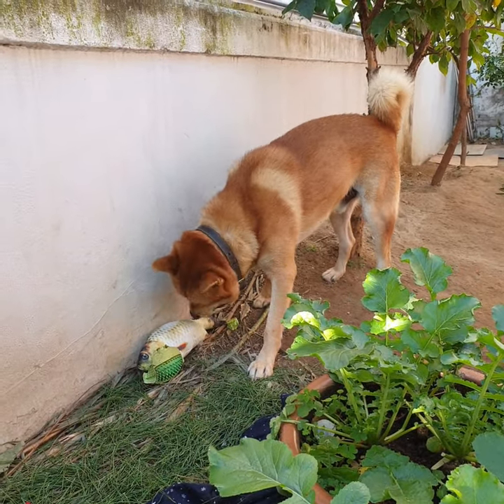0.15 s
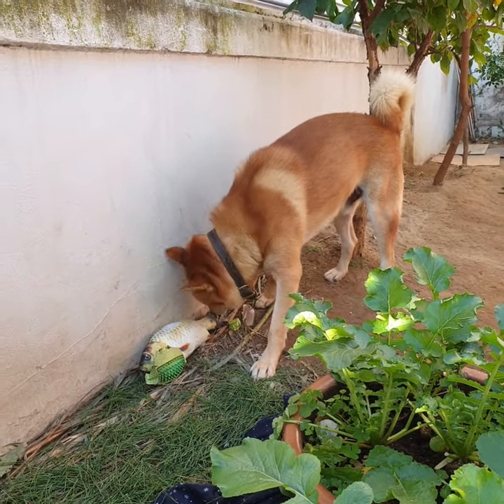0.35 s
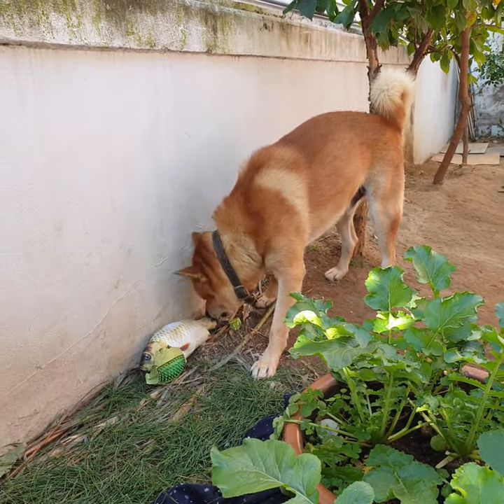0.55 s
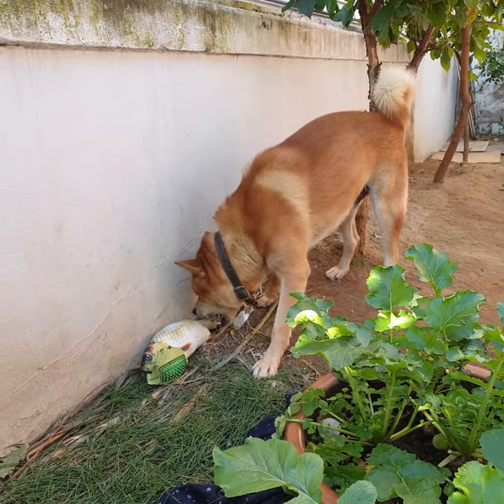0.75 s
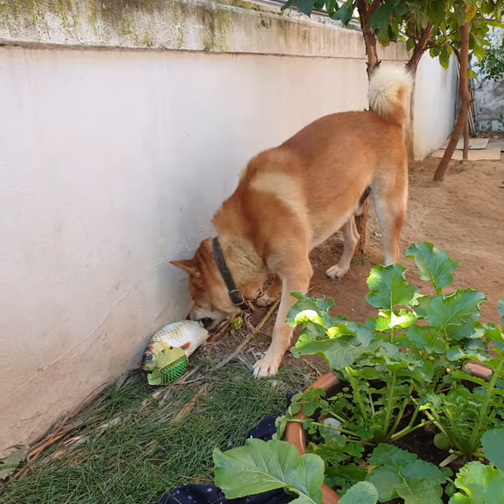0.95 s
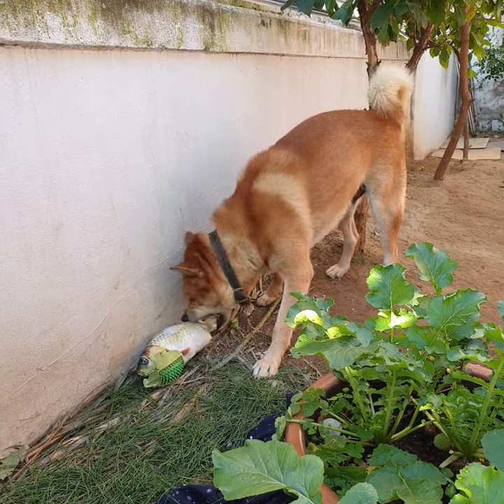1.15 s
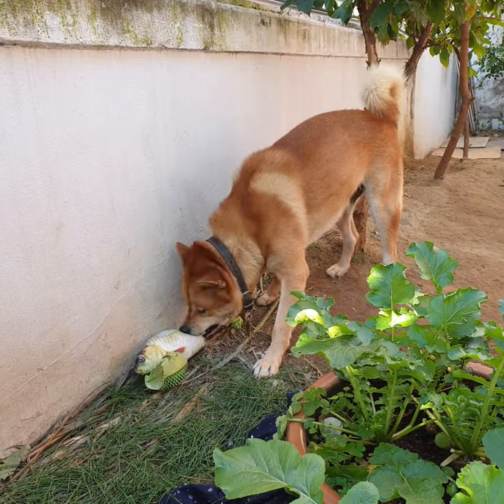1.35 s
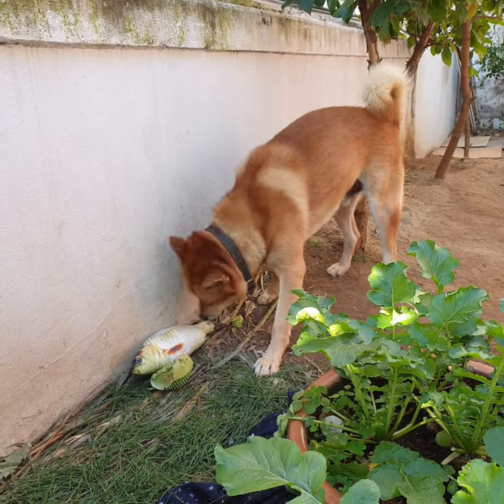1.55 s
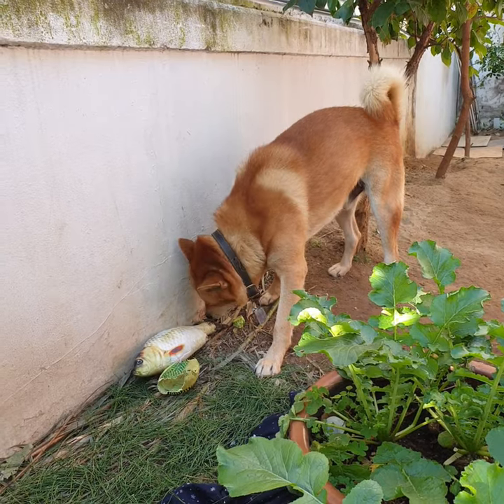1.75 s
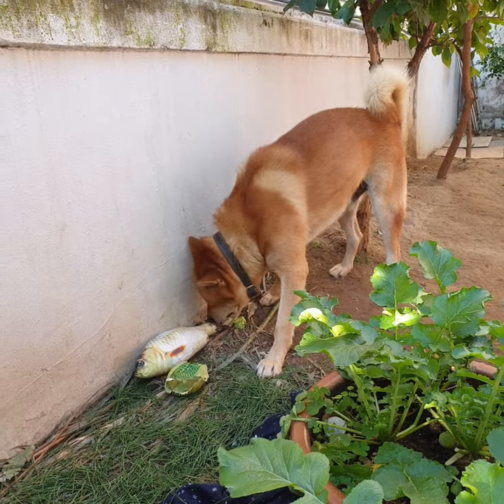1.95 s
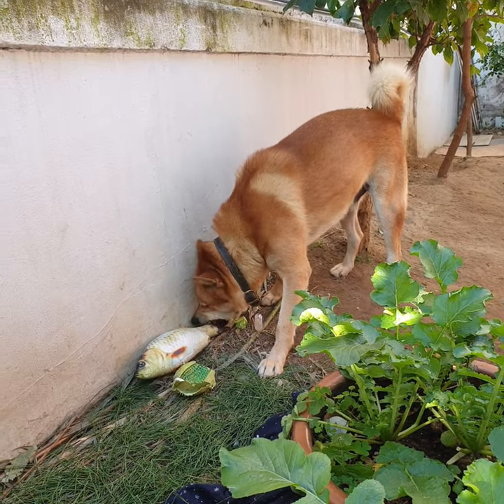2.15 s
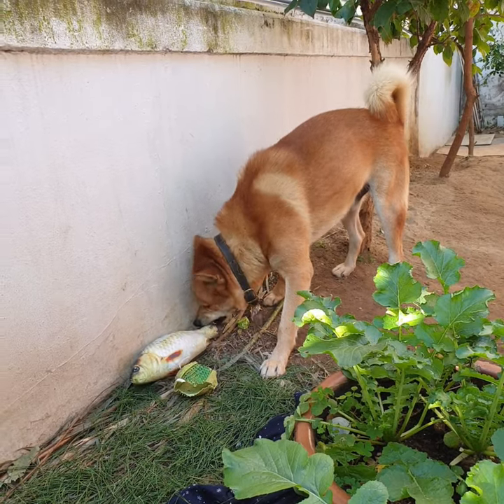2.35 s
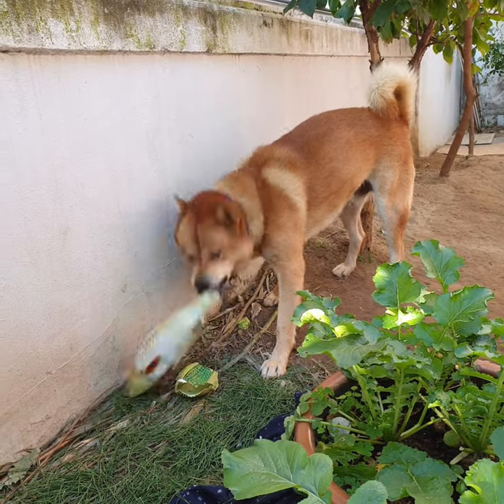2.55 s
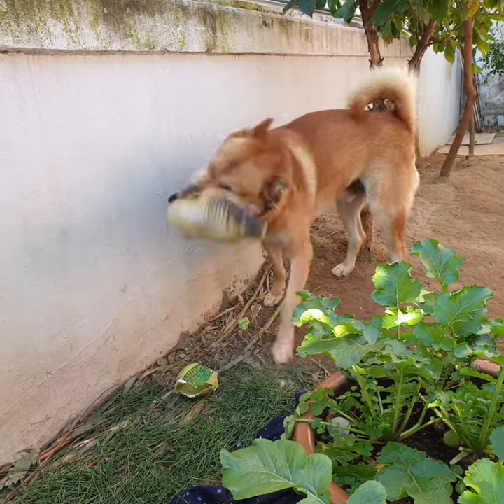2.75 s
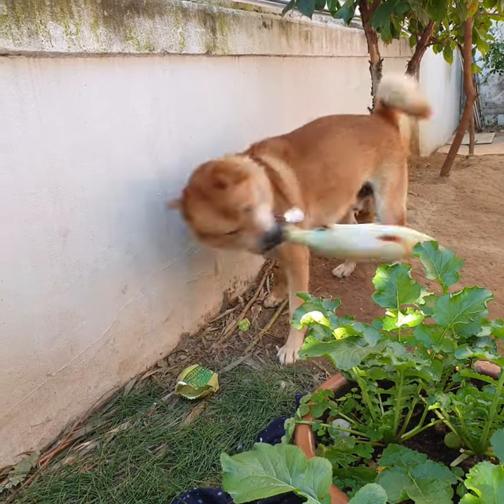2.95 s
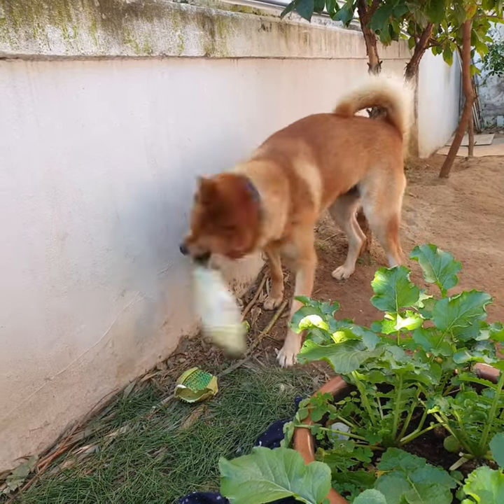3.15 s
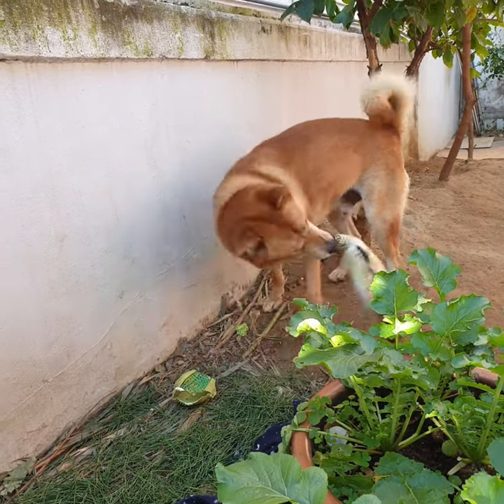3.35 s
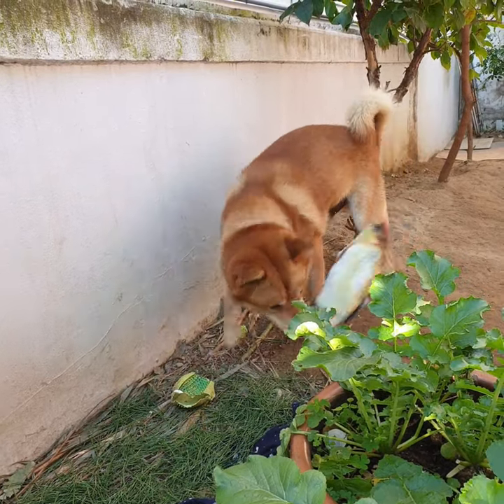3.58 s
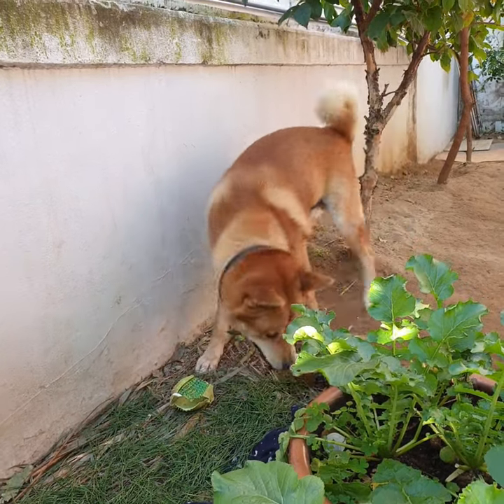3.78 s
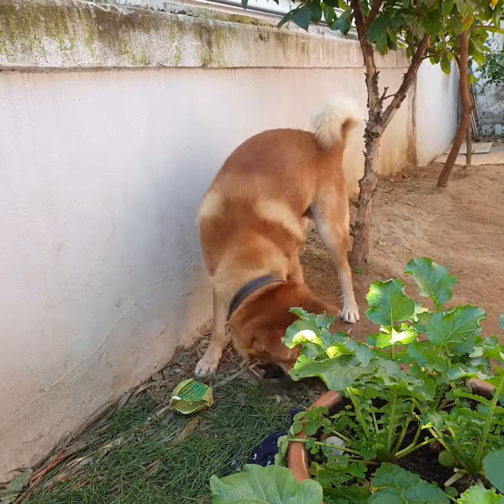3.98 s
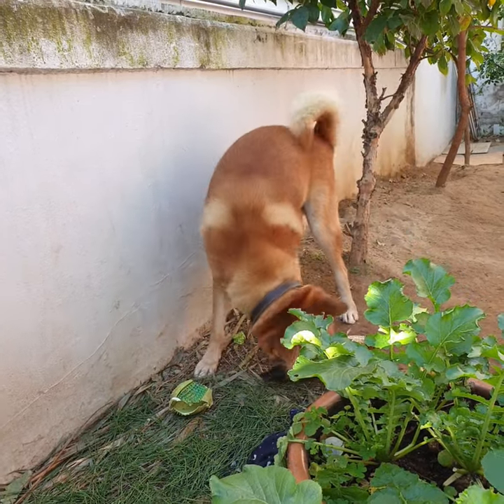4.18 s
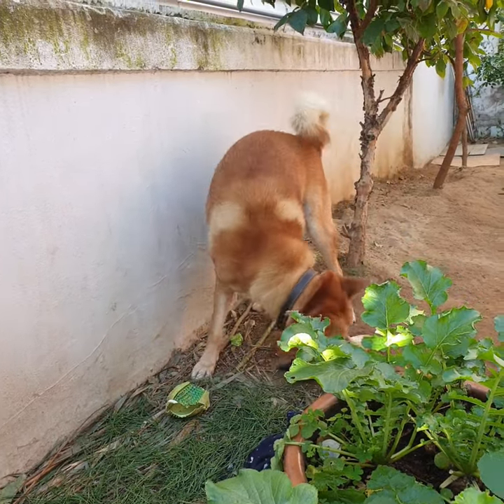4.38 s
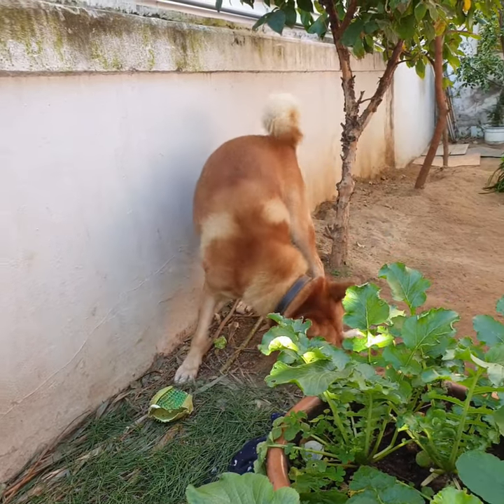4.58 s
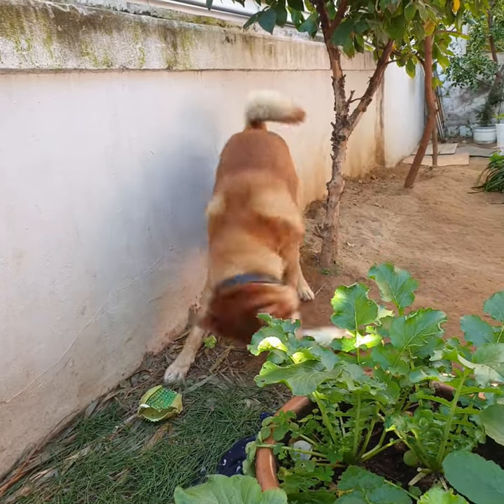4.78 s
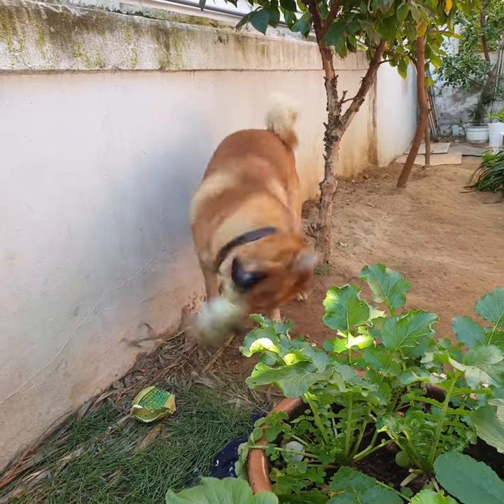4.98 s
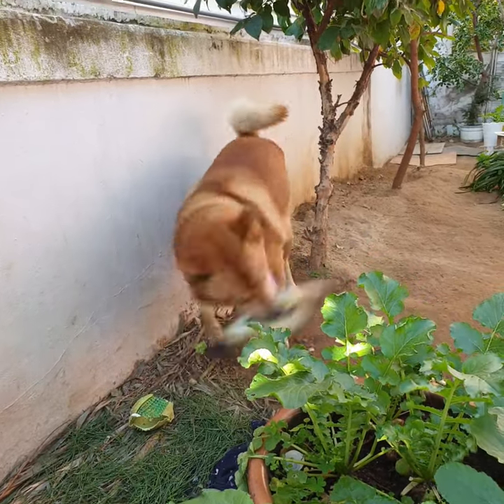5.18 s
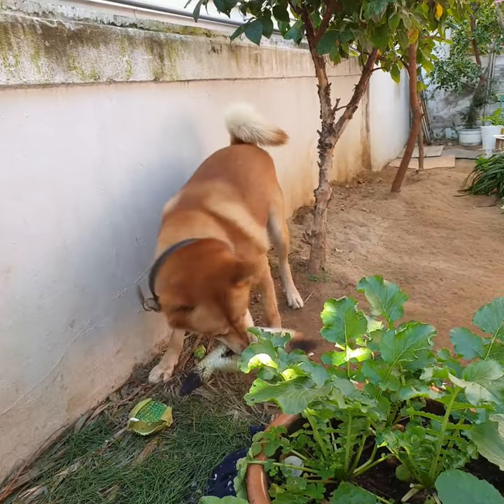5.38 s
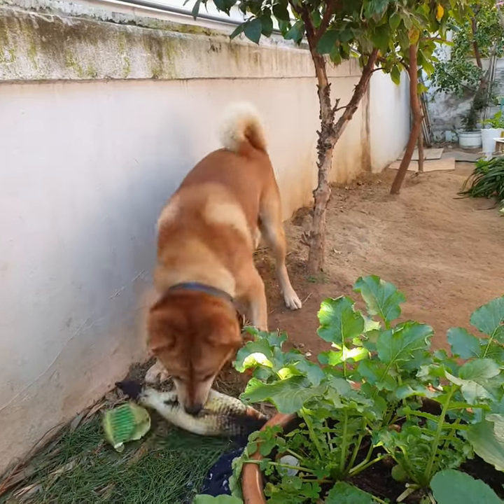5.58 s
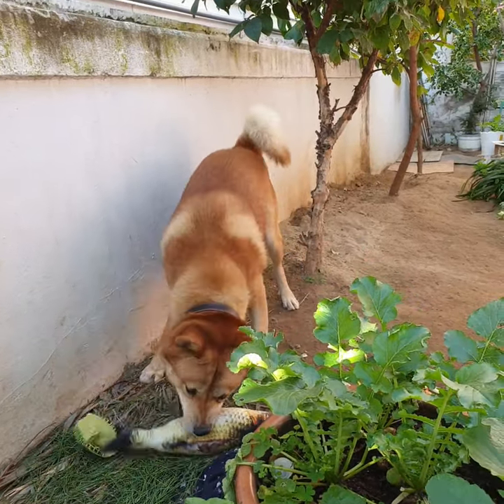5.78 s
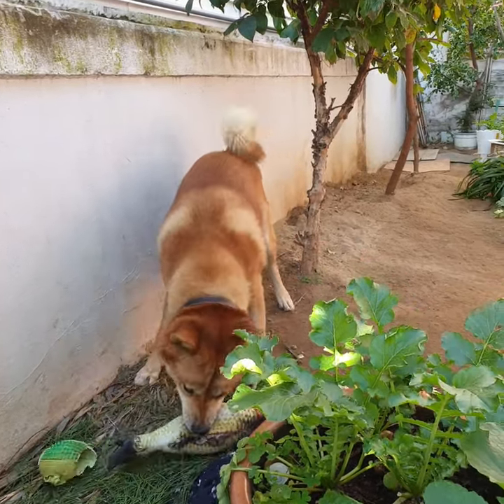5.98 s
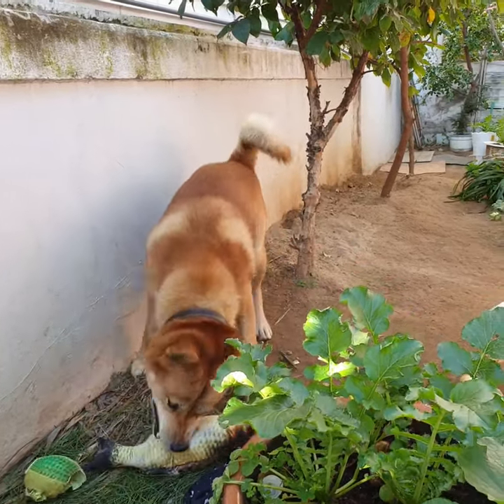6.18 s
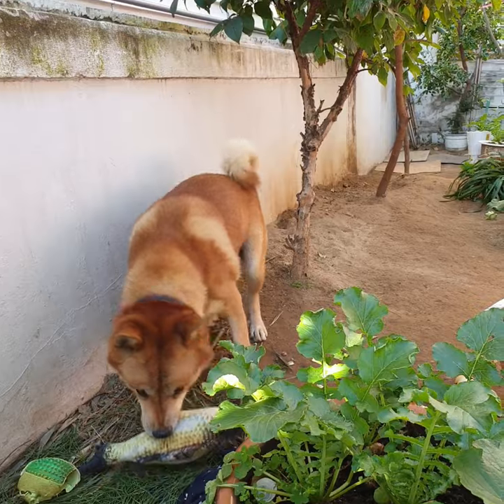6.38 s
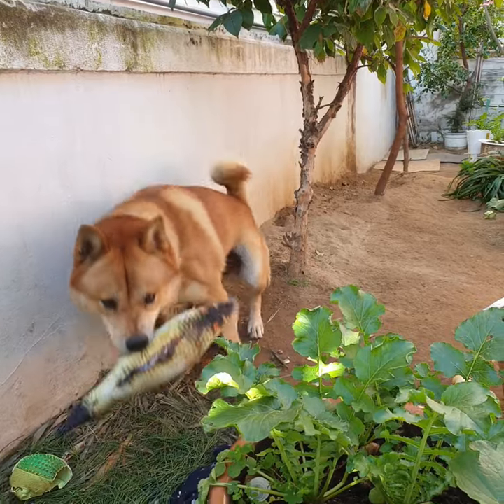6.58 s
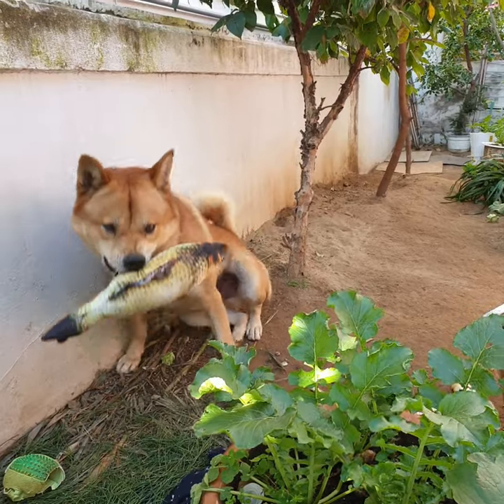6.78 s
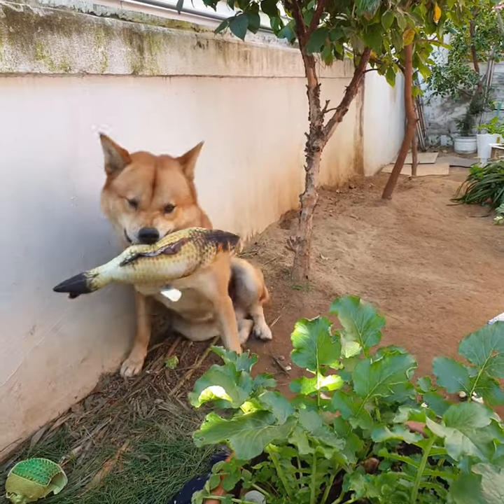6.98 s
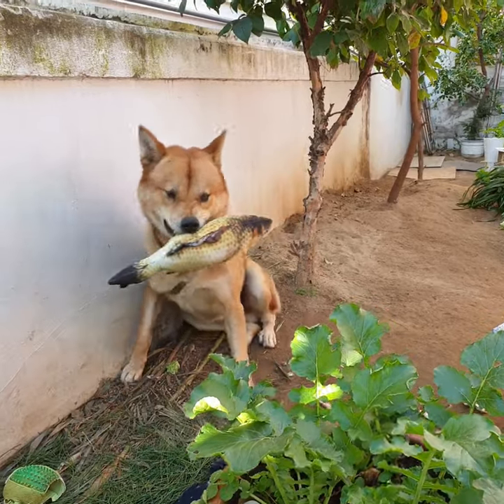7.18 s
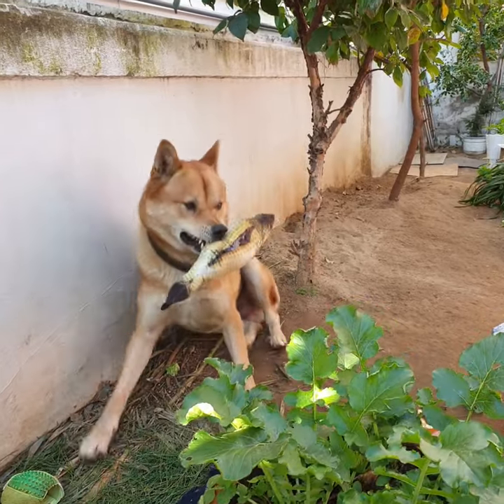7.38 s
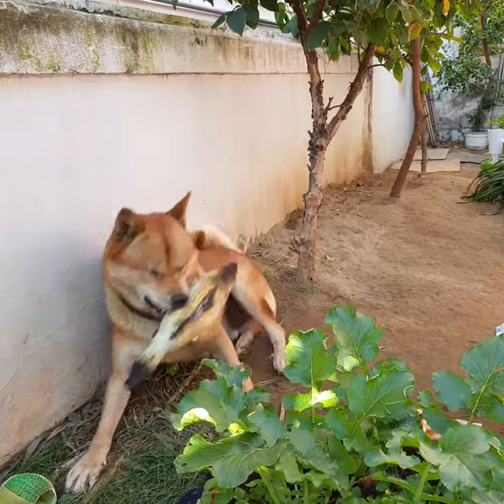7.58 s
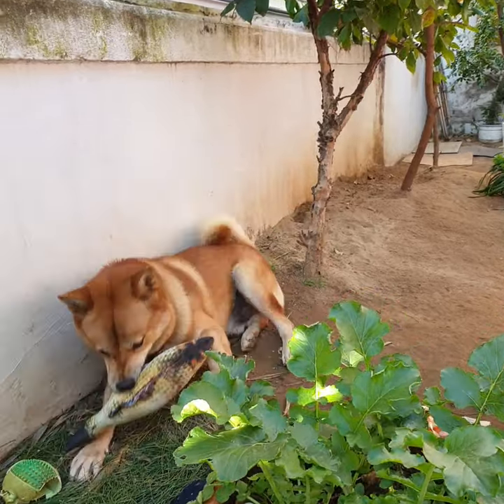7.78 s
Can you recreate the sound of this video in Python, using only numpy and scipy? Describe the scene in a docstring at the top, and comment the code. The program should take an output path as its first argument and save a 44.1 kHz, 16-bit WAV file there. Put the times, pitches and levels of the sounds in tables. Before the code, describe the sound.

In a quiet garden with a low rumble of far traffic, cloth and dry grass rustle softly as a dog mouths a stuffed toy near the microphone. Its metal collar tags break into two bouts of bright jingling, the first with a dull knock of the toy and a twig crack. Lighter clinks and scuffs follow, then one sharp snap, with very short echoes off a wall.

```python
"""Far traffic rumbles under a faint hiss, and two faint high chirps sound. Beside a garden wall a dog
shakes and mouths a soft toy. Grass and cloth rustle as crowds of tiny noise pulses; twigs snap and tick
in short bursts. The metal collar tags collide and jingle in their free modes of vibration; the stuffed
toy thumps in low, heavily damped ones. Wall and ground return short echoes of the tags and bursts."""
import sys
import numpy as np
from scipy import signal
from scipy.fft import rfft, irfft, next_fast_len
from scipy.io import wavfile

SR = 44100
rng = np.random.default_rng(int(sys.argv[2]) if len(sys.argv) > 2 else 0)


def inscribe(sig):
    """Save sig as 16-bit PCM at rate SR to the path in sys.argv[1].

    A 1-D sig is mono; a 2-D sig holds one channel per row.
    Samples are clipped to [-1, 1] before scaling.
    """
    pcm = np.round(np.clip(np.atleast_2d(sig).T, -1, 1) * 32767)
    wavfile.write(sys.argv[1], SR, pcm.astype(np.int16))


N = 345561

# dull noise of traffic and ground: (frequency [Hz], spectral level [dB])
DULL_SPECTRUM = [(53, -27), (90, -10.5), (171, -3), (194, -8.5), (233, -7), (326, -14), (416, -12.5),
                 (485, -17), (680, -17), (1550, -27), (3500, -54.5), (4550, -72.5), (7700, -120)]
# bright noise of grass and fur: (frequency [Hz], spectral level [dB])
BRIGHT_SPECTRUM = [(880, -22), (1500, -1.5), (1940, -10.5), (3120, -1), (5220, -0.5), (6630, 2.5),
                   (8740, -5.5), (13800, 0), (16000, -3)]
# blows on the toy: (time [s], peak level [dB], contact cutoff [Hz], push or pull [+1 or -1])
TOY_BLOWS = [(1.398, -44, 294, 1), (2.967, -34, 300, 1), (3.062, -27.5, 600, -1), (3.064, -28.5, 593, 1),
             (3.162, -12.5, 1550, -1), (3.1638, -4, 2270, 1), (3.177, -17, 500, -1), (3.206, -20.5, 300, 1),
             (3.223, -24, 296, 1), (3.836, -37.5, 299, 1), (5.186, -39.5, 700, 1), (5.653, -41, 400, 1),
             (7.018, -31, 920, 1), (7.556, -39, 700, -1)]


def from_db(db):
    """Amplitude ratio: tenfold for every 20 dB."""
    return 10 ** (np.asarray(db) / 20)


def rms_one(x):
    """Normalisation to unit mean power."""
    return x / np.sqrt(np.mean(x ** 2) + 1e-20)


def in_time(rows):
    """Linear interpolation of each column over the times in the first."""
    s, *columns = np.transpose(rows)
    return [np.interp(np.arange(N) / SR, s, column) for column in columns]


def at_hz(points, hz):
    """Interpolation on a logarithmic frequency axis."""
    known_hz, values = np.transpose(points)
    return np.interp(np.log(hz), np.log(known_hz), values)


def sides(pan_db):
    """Interaural level difference as left and right gains."""
    return from_db(np.array([pan_db, -pan_db]) / 2)


def drift(hz):
    """Random modulation: noise low-passed at `hz`, with unit rms."""
    step = 40   # samples per control value
    r = np.exp(-2 * np.pi * hz * step / SR)
    slow = signal.lfilter([1], [1, -2 * r, r * r], rng.standard_normal(N // step + 2002))[2000:]
    return np.interp(np.arange(N) / step, np.arange(len(slow)), rms_one(slow))


def ring(clicks, hz, t60):
    """Damped resonator: a unit impulse starts a decaying sine of height 1."""
    r, w = from_db(-60 / (t60 * SR)), 2 * np.pi * hz / SR
    return signal.lfilter([0, np.sin(w)], [1, -2 * r * np.cos(w), r * r], clicks + 1e-18)


def dying(s, db, t60):
    """Exponential decay: an envelope that jumps at each time and dies away."""
    jumps = np.zeros(N)
    jumps[np.round(s * SR).astype(int)] = from_db(db)
    return signal.lfilter([1], [1, -from_db(-60 / (t60 * SR))], jumps + 1e-18)


def coloured(white, spectrum, min_coherence=0.):
    """Spectral shaping of two noises to unit rms; the ears agree most at long wavelengths."""
    # likeness of left and right: (frequency [Hz], coherence [0-1])
    coherence = [(60, .99), (130, .93), (290, .82), (640, .46), (1410, .05), (3100, 0)]
    size = next_fast_len(N, True)
    hz = np.maximum(np.fft.rfftfreq(size, 1 / SR), 1)
    inside = (hz >= spectrum[0][0]) & (hz <= spectrum[-1][0])
    mid, side = rfft(white, size) * from_db(at_hz(spectrum, hz)) * inside
    alike = np.clip(at_hz(coherence, hz), min_coherence, 1)
    ears = np.sqrt(1 + alike) * mid + np.sqrt(1 - alike) * side * [[1], [-1]]
    return rms_one(irfft(ears, size)[:, :N])


def white_noise():
    """Gaussian noise with a flat spectrum, independent in each ear."""
    return rng.standard_normal((2, N))


def grains(spread_db):
    """Crackling noise: dense tiny breaks of uneven size."""
    return white_noise() * from_db(spread_db * np.minimum(rng.exponential(1, (2, N)), 4))


def low_rumble():
    """Low-frequency noise: far traffic rumbles and drones, swelling also under the toy's thumps."""
    # swell and ebb: (time [s], rumble level [dB], drone level [dB])
    levels = [(0.0, -47, -58.5), (1.0, -50, -58), (1.5, -49.5, -55.5), (2.46, -48, -57.5),
              (3.12, -43, -54.5), (3.6, -52.5, -60.5), (3.9, -49, -57), (4.28, -48.5, -61),
              (4.52, -54, -58.5), (4.97, -49, -57.5), (5.35, -51.5, -59.5), (5.63, -45.5, -53.5),
              (6.24, -51, -57.5), (6.9, -46, -58), (7.84, -47.5, -55)]
    # deep rumble: (frequency [Hz], spectral level [dB])
    rumble_spectrum = [(22, -38.5), (33, -13.5), (45, -1.5), (58, 3.5), (80, -5.5), (110, -11.5),
                       (150, -21.5)]
    rumble_db, drone_db = in_time(levels)
    rumble = from_db(rumble_db) * coloured(white_noise(), rumble_spectrum)
    drone = from_db(drone_db) * coloured(white_noise(), DULL_SPECTRUM)
    return rumble + drone


def hiss(level_db=-80):
    """Stationary noise: a faint, steady band of treble."""
    # hiss: (frequency [Hz], spectral level [dB])
    spectrum = [(1470, -39), (2500, -8), (2770, -6), (3220, -15), (4240, -10), (5290, -13.5), (6710, -30),
                (7430, -14), (8700, -28.5), (12300, -13), (15100, -14), (16000, -17.5), (16500, -34)]
    return from_db(level_db) * coloured(white_noise(), spectrum)


def rustle(blades_at_rest_db=-94):
    """Friction noise: as the dog moves, dry blades crackle in clumps and cloth drags more dully."""
    # movements: (time [s], blade level at 3-3.6 kHz [dB], cloth and soil level [dB],
    # 20 dB rise time [s], 20 dB fall time [s])
    movements = [(1.26, -85, -76, 0.22, 0.5), (2.77, -75.5, -63, 0.25, 0.1),
                 (2.88, -51.5, -51.5, .05, 0.07), (2.965, -57, -63, .05, 0.06), (3.07, -60, -52, 0.08, .1),
                 (3.16, -51, -38, .03, 0.06), (3.23, -54, -64, 0.02, 0.0736), (3.29, -65, -76, .03, 0.1),
                 (3.4, -69, -65, -0.06, 0.03), (3.58, -60.5, -74, .09, 0.07), (3.66, -79, -61.5, 0, 0.35),
                 (4.71, -75, -58, 0.22, 0.2), (4.9, -62, -54, .05, 0.27), (5.04, -81, -64.5, 0, 0.42),
                 (5.21, -66, -83, 0.13, 0.36), (5.373, -68.5, -72, -0.05, 0.3),
                 (5.658, -54.5, -54, 0.0049, 0.1), (6.231, -72, -68, 0.08, .15),
                 (6.3, -69.5, -59.5, 0.39, 0.33), (6.79, -82.5, -64.5, 0.1, 0.8),
                 (7.023, -45.5, -50, 0.016, .04), (7.059, -68.5, -58, 0.11, 0.14),
                 (7.528, -62.5, -58, 0.14, 0.21), (7.78, -70.5, -57.5, 0.33, .5)]
    # cloth and soil between movements: (time [s], level [dB])
    nosing = [(0, -73.5), (.6, -72), (1.3, -65.5), (2.5, -63.5), (3.7, -62.5), (4.4, -67), (5.5, -63),
              (6.1, -64.5), (6.65, -71), (7.2, -62), (7.84, -62)]
    # dragging cloth: (frequency [Hz], spectral level [dB])
    cloth_spectrum = [(300, -7), (600, -7), (1000, -4), (1600, -10.5), (2500, -16.5), (4000, -29)]

    def swells(peak_db):
        """Exponential growth and decay about each movement, at most 20 dB in 5 ms."""
        t, envelope = np.arange(0, N / SR, .002), 0
        for (s, _, _, rise, fall), db in zip(movements, peak_db):
            drop_db = 20 * np.maximum((s - t) / max(rise, .005), (t - s) / max(fall, .005))
            envelope += from_db(db - drop_db)
        return np.interp(np.arange(N) / SR, t, envelope)

    blade_db, cloth_db = np.transpose(movements)[1:3]
    blades = coloured(grains(4.2), BRIGHT_SPECTRUM, min_coherence=0.026)
    level_band = signal.butter(3, [3000, 3600], "band", fs=SR, output="sos")
    blades /= np.std(signal.sosfilt(level_band, blades))
    cloth = coloured(grains(2.2), cloth_spectrum, min_coherence=0.098)
    blades *= (from_db(blades_at_rest_db) + swells(blade_db)) * from_db(1.2 * drift(hz=21))
    cloth *= np.hypot(from_db(in_time(nosing)[0]), swells(cloth_db)) * from_db(1.77 * drift(hz=22))
    return blades * sides(-0.87)[:, None] + cloth


def chirps_and_snaps():
    """Decaying bursts of band-limited noise: two faint high chirps, then twig snaps and ticks."""
    # (time [s], level [dB], centre [Hz], width [octaves], t60 [s], left minus right [dB])
    noise_bursts = [(0.165, -61.5, 7160, 0.28, 0.025, -17), (0.191, -67, 7200, 0.25, 0.089, -14),
                    (1.19, -57, 8000, 2.7, 0.79, -8), (2.551, -60, 7100, 0.85, 0.32, -17),
                    (2.614, -50, 9450, 1.3, 0.3, -9), (3.164, -27, 2900, 1.5, 0.05, -5),
                    (3.227, -17.5, 3530, 1.9, 0.011, -5), (3.856, -58.5, 6000, 1.9, 0.44, -12),
                    (3.933, -52.5, 9000, 2.8, 0.096, -6), (5.1, -36.5, 1510, 0.28, 0.041, -1),
                    (5.19, -41.5, 1290, 3.2, 0.033, 9), (5.38, -47, 1300, 1.7, 0.048, 4),
                    (5.481, -43, 1420, 0.62, 0.054, 0), (5.659, -35, 1200, 3.3, 0.024, 4),
                    (6.546, -46, 510, 1, 0.35, 9), (6.756, -52, 3920, 3, 0.051, -10),
                    (7.0187, -13, 4860, 0.84, 0.013, -10), (7.019, -15, 11600, 1, 0.0096, -7),
                    (7.024, -33, 4700, 2.2, 0.15, -4), (7.021, -25, 980, 1.1, 0.017, 6),
                    (7.558, -38, 1540, 0.76, 0.024, 8)]
    crest_db = 9   # the rms starts this far below the level
    out, t = np.zeros((2, N)), np.arange(SR // 6) / SR
    for s, db, hz, octaves, t60, pan_db in noise_bursts:
        edges = np.minimum(hz * 2 ** (np.array([-.5, .5]) * octaves), SR / 2.1)
        band = signal.butter(2, edges, "band", fs=SR, output="sos")
        noise = rms_one(signal.sosfilt(band, rng.standard_normal(len(t))))
        burst = noise * from_db(db - crest_db - 60 * t / t60)
        i = round(s * SR)
        out[:, i:i + len(t)] += sides(pan_db)[:, None] * burst
    return out


def loose_contacts(s, db, per_s=400):
    """Poisson process: light contacts die away after each strike; gives samples and strengths."""
    at = np.flatnonzero(rng.random(N) < per_s / SR)
    density_gain = np.sqrt(SR / per_s)   # equal power at any contact rate
    return at, dying(s, db - 30, t60=0.18)[at] * density_gain


def fur_scuff(at, db, pan_db, t60=0.039):
    """Friction noise: the collar rubs the fur at each strike, bright and quickly fading."""
    jumps = np.zeros((2, N))
    jumps[:, at] = sides(pan_db) * from_db(db)
    envelope = signal.lfilter([1], [1, -from_db(-60 / (t60 * SR))], jumps)
    return envelope * coloured(grains(2.2), BRIGHT_SPECTRUM, min_coherence=0.093)


def collar_tags():
    """Modal vibration of plates: each strike is a chatter of five touches that sets the tags ringing."""
    # collisions: (time [s], level [dB], left minus right [dB],
    # relative drive at 2.3 kHz [dB], at 2.8 kHz [dB], at 4-6 kHz [dB], at 7-9 kHz [dB])
    strikes = [(0.9028, -46.5, -4, -30, -39, -15.5, -11), (1.2854, -54, -13, -38, -40, -26, -18),
               (1.624, -47.5, -4, -31, -29, -16, -17), (1.645, -40, -4, -35.5, -32, -13.5, -10),
               (2.81, -23.5, -5, -35, -32, -16, -10.5), (2.8264, -28.5, 3, -29, -34, -25, -16),
               (2.8486, -20, -2.0, -33, -24, -15, -12), (2.8714, -23, 3, -31, -19.5, -8.5, -19),
               (2.8892, -30.5, 1, -30, -11, -9.5, -14), (2.9472, -28.5, -3, -30, -26, -16, -14),
               (2.9634, -32.5, -2, -28, -29, -15, -12), (3.0056, -33, -3.0, -24.5, -33, -14, -17),
               (3.027, -24.5, -3.5, -23, -18, -10, -11), (3.0434, -27.5, 1, -20, -17, -17, -16),
               (3.0634, -30.5, -1.0, -26, -10, -13, -14), (3.0894, -30, -2.0, -21, -26, -7, -17),
               (3.2126, -21.5, -5, -27, -40, -10, -14), (3.2266, -22, -2, -36, -34, -17, -22),
               (3.2534, -47, 1.5, -24, -19, -13, -13), (3.2852, -29.5, -6, -35, -25, -16, -8.5),
               (3.3448, -36, -6.5, -31, -30, -7.5, -25), (3.4755, -37, 0, -42, -32, -17, -13.5),
               (3.491, -30.5, -5, -35, -34, -25, -10), (3.5324, -40, -1, -19, -15, -10, -7),
               (3.5724, -34, 0.0, -7.5, -7.5, -6.5, -21), (3.6641, -35, 2, -12, -18.5, -21, -21),
               (3.9559, -54, 2, -23.5, -31, -18, -10.5), (4.583, -39.5, -2, -27, -31, -19, -4),
               (4.6518, -42, -0.5, -30, -20, -18, -17), (4.7032, -50, 8, -20, -20, -19, -22),
               (4.9387, -27, -2.5, -26.5, -30, -21.5, -14), (5.0399, -16.5, -2.5, -23, -49, -32, -10.5),
               (5.1267, -36, -5, -32, -28, -15.5, -17), (5.1402, -35, -4, -30, -19, -13, -12),
               (5.1896, -30, -4, -44, -28, -14.5, -15), (5.2964, -45.5, -4, -17, -7.5, -8, -23),
               (5.3742, -33, -1, -25, -18, -7, -11), (5.4097, -36.5, -5.0, -28, -22, -24, -12),
               (5.4311, -33.5, -11, -33, -30, -31, -9), (5.4799, -31.5, -6.5, -32.5, -19, -13, -15.5),
               (5.6264, -29.5, -0.5, -23, -18, -9, -11), (5.6506, -28.5, -1, -19, -20, -6, -11),
               (5.6575, -25.5, -4, -20, -26, -10, -9), (5.8184, -31, -3, -21, -33, -26, -15),
               (6.2234, -41, -12, -37, -42, -23, -19), (6.3485, -45.5, -8, -31, -36, -9.5, -12),
               (6.3909, -43.5, -3, -32, -36, -11, -5), (6.5271, -55, -9, -35, -38, -17, -5),
               (6.7778, -41, 0, -21, -6.5, -8, -9), (6.8307, -42, -7, -29, -39, -11.5, -7.5),
               (6.9511, -54, -5, -21, -26, -9, -9), (7.45, -39.5, -7.5, -22, -24, -16, -15)]
    # tag modes in eight groups: (frequency [Hz], level [dB], t60 [s])
    mode_groups = [
        [(2284, 3, 0.17)],
        [(2795, 2, 0.25)],
        [(3860, -8.5, 0.1), (4440, -7, 0.12)],
        [(5010, -7, 0.14), (4930, -18, 0.028), (5810, -2.5, 0.056), (6290, -4, .1)],
        [(6980, -5.5, 0.059), (7830, -7, 0.085), (8150, 3, 0.029), (8300, -6.5, 0.08), (9420, -12, 0.019)],
        [(9970, -20, 0.079), (10820, -8.5, .07)],
        [(11730, -15.5, 0.089), (12950, -19, 0.033)],
        [(13900, -22, 0.03), (14470, -9.5, 0.039), (15420, -14, .04)],
    ]
    # response to loose contacts, per group: (relative level [dB])
    rattle_levels = [-32.5, -31.5, -22.5, -21, -22.5, -11.5, -10, -9.5]
    # random variation between strikes, per group: (standard deviation [dB])
    spreads = [1.4, 1.9, 4, 4.1, 3.8, 4, 3.9, 3.7]
    s, strike_db, pan_db, low_db, mid_db, upper_db, high_db = np.transpose(strikes)
    touch_db = np.array([-12, -8.0, -10.5, -14, -23.5])
    lags_s = np.cumsum(rng.uniform(0.00054, .0045, (len(s), 4)), axis=1)
    touch_at = np.round(SR * (s[:, None] - .0015 + np.c_[np.zeros(len(s)), lags_s])).astype(int)
    flutter = [from_db(4.97 * drift(hz=89)) for _ in range(4)]   # swinging tags turn and damp each other
    rattle_at, rattle = loose_contacts(s, strike_db)

    def mode(hz, t60, hit_db, rattle_db, spread_db):
        """Directivity: a plate mode reaches each ear with its own strength and phase."""
        chance = rng.standard_normal((len(s), 8))
        touches = from_db(touch_db + 2.5 * chance[:, :5])
        left, right = sides(pan_db + 3.2 * chance[:, 5]) * from_db(hit_db + spread_db * chance[:, 6])
        right_lag = np.round(3.0 * chance[:, 7:]).astype(int)
        clicks = np.zeros((2, N))
        clicks[:, rattle_at] = from_db(rattle_db) * rattle * rng.standard_normal((2, len(rattle_at)))
        clicks[0, touch_at] = left[:, None] * touches
        clicks[1, touch_at + right_lag] = right[:, None] * touches
        return ring(clicks, hz, t60)

    # where a strike lands weights the lower five groups
    landing_db = [low_db, mid_db, upper_db, upper_db, high_db, 0, 0, 0]
    out = np.zeros((2, N))
    for group, modes in enumerate(mode_groups):
        for k, (hz, db, t60) in enumerate(modes):
            hit_db = strike_db + landing_db[group] + db
            ringing = mode(hz, t60, hit_db, db + rattle_levels[group], spreads[group])
            out += ringing * flutter[(group + k) % 4]
    # rings, links and buckle add a crowd of small, short modes
    for hz in np.geomspace(3700, 15600, 26) * rng.uniform(1.0, 1.02, 26):
        out += mode(hz, t60=0.051, hit_db=strike_db - 26, rattle_db=-25.5, spread_db=4.6)
    return out + fur_scuff(touch_at[:, 1], strike_db - 18.5, pan_db)


def toy_thumps():
    """Soft impact: the contact low-passes the body's impulse response; harder blows sound brighter."""
    # modes of the stuffed toy: (frequency [Hz], level [dB], t60 [s])
    modes = [(113, -1.5, 0.097), (195.7, 3.5, 0.058), (269, -1, 0.037), (394, -9, 0.051),
             (548, -2.5, 0.022), (832, -14, 0.028), (1170, -2, 0.025), (1580, -6, 0.018),
             (2130, -3.5, 0.0091)]
    click = signal.unit_impulse(SR // 3)
    body = sum(from_db(db) * ring(click, hz, t60) for hz, db, t60 in modes)
    radiation = signal.butter(2, 85, "high", fs=SR, output="sos")   # a small body radiates little bass
    body = signal.sosfilt(radiation, body)
    out = np.zeros(N)
    for s, db, contact_hz, direction in TOY_BLOWS:
        r = np.exp(-2 * np.pi * contact_hz / SR)
        blow = signal.lfilter([1], [1, -2 * r, r * r], body)
        blow *= direction * from_db(db) / np.abs(blow).max()
        i = round(s * SR)
        out[i:i + len(blow)] += blow[:N - i]
    right = np.roll(out, round(.00012 * SR))   # the sound reaches the left ear first
    return np.array([out, right]) * sides(0.54)[:, None]


def ground_boom():
    """Reverberant decay: ground and wall answer each thump with a short, dull noise."""
    s, db = np.transpose(TOY_BLOWS)[:2]
    return dying(s, db - 34, t60=0.34) * coloured(white_noise(), DULL_SPECTRUM)


def with_echoes(direct):
    """Early reflections: wall and ground add weaker copies, with different delays at each ear."""
    # echo paths: (left delay [s], right delay [s], level [dB])
    reflections = [(.0031, .0046, -7), (.011, .0087, -13), (.023, .027, -19)]
    out = direct.copy()
    for *lags, db in reflections:
        for ear, lag in enumerate(lags):
            i = round(lag * SR)
            out[ear, i:] += from_db(db) * direct[ear, :-i]
    return out


def scene():
    """Superposition: the garden's sounds add to the rumble and hiss."""
    garden = with_echoes(collar_tags() + chirps_and_snaps()) + toy_thumps() + ground_boom() + rustle()
    return garden + low_rumble() + hiss()


def record(dry):
    """Band limiting: a steep low-pass removes the highest treble."""
    stop_hz, stop_db = 16250, 60
    return signal.sosfilt(signal.cheby2(14, stop_db, stop_hz, fs=SR, output="sos"), dry)


dry = scene()
out = record(dry)
inscribe(out)
```